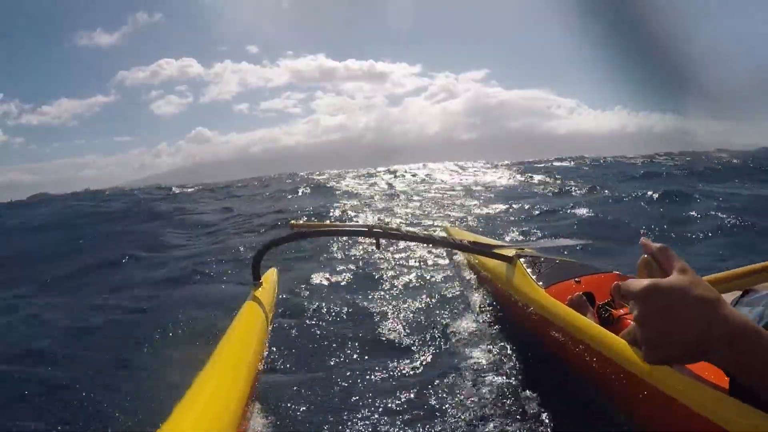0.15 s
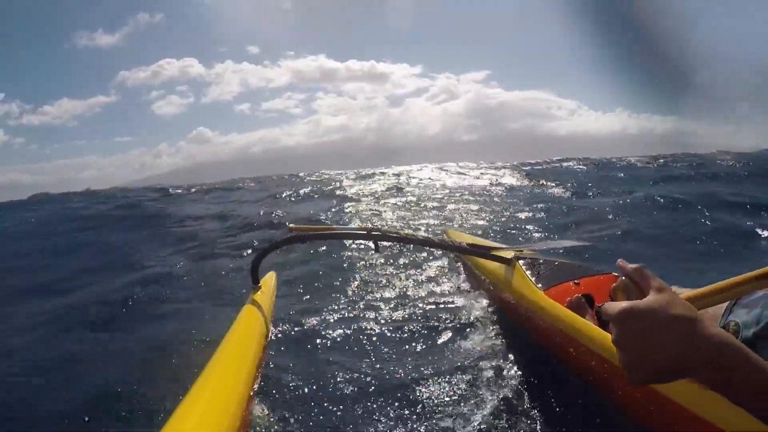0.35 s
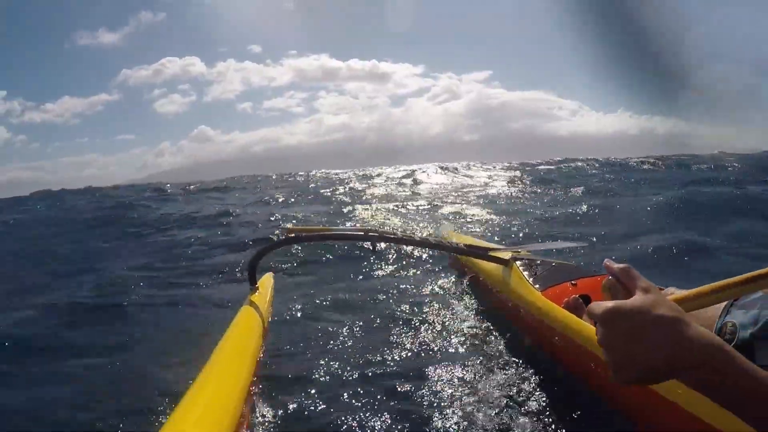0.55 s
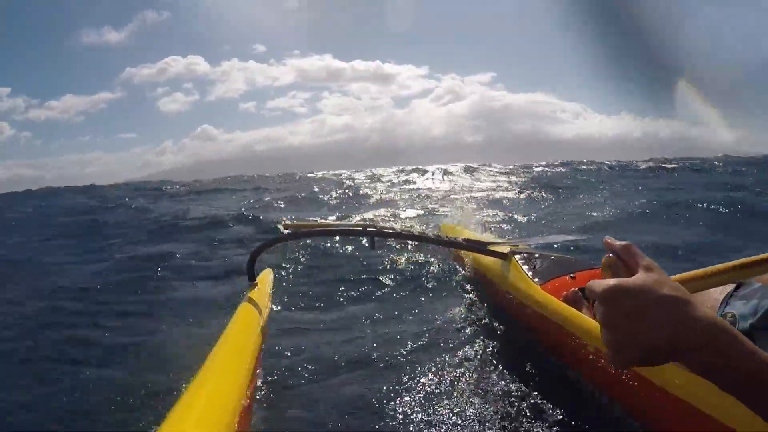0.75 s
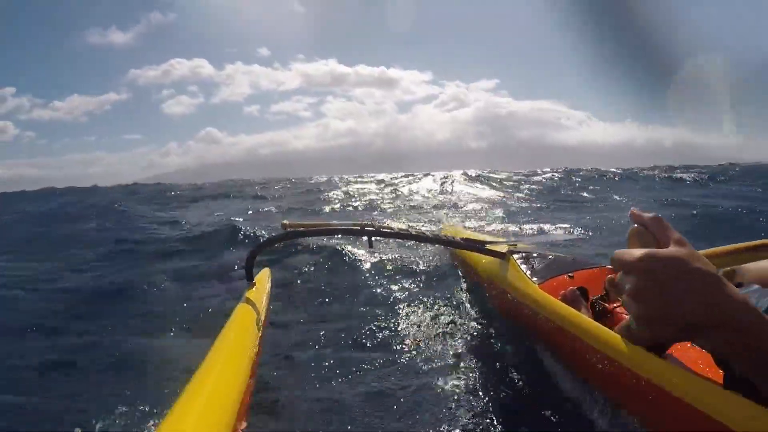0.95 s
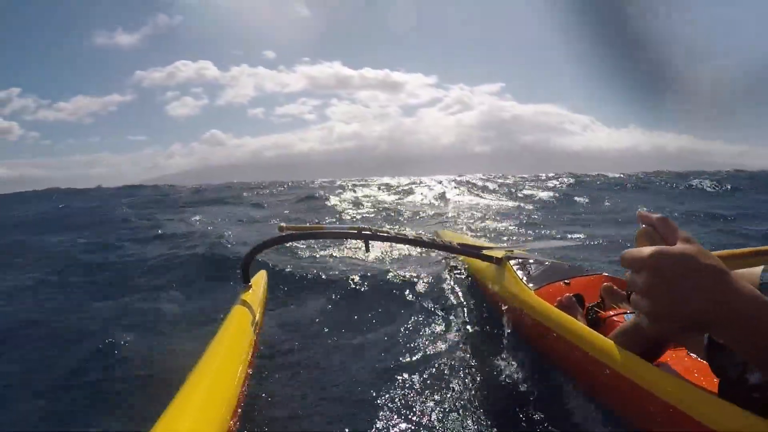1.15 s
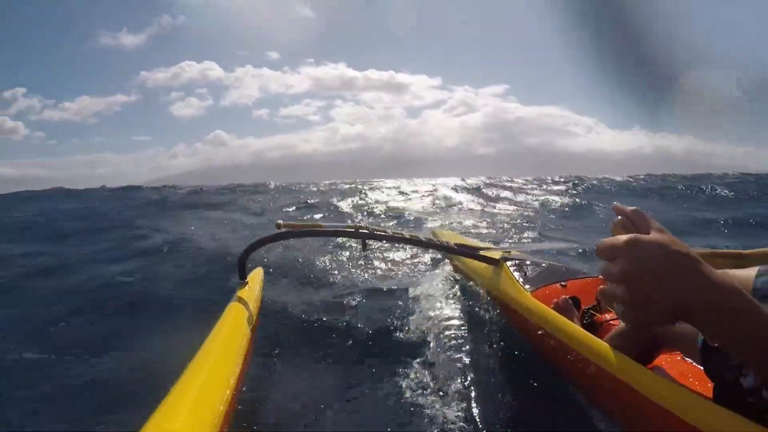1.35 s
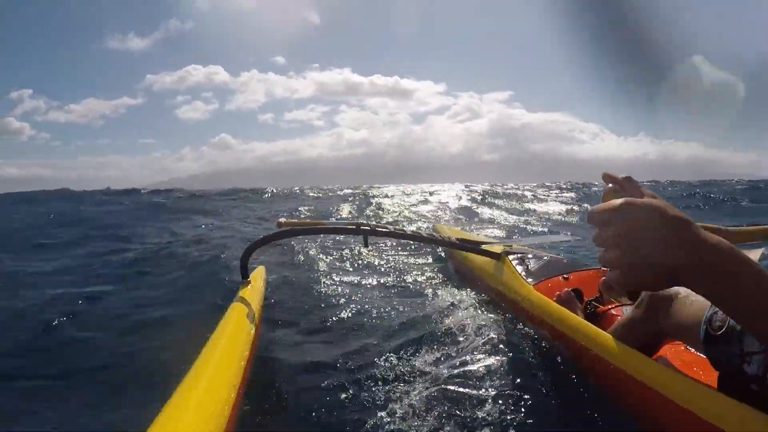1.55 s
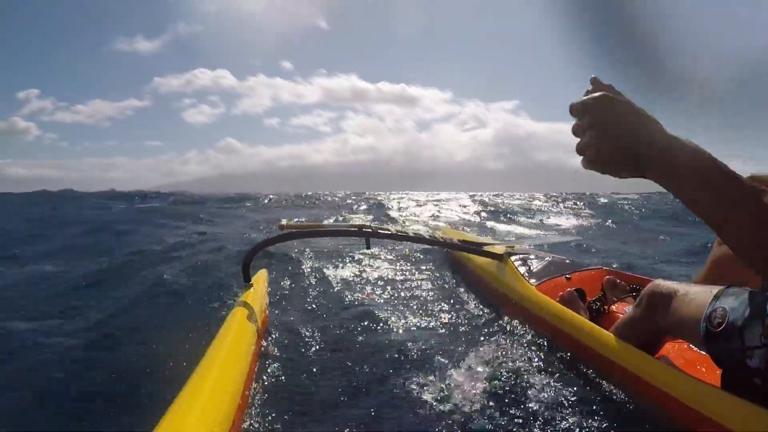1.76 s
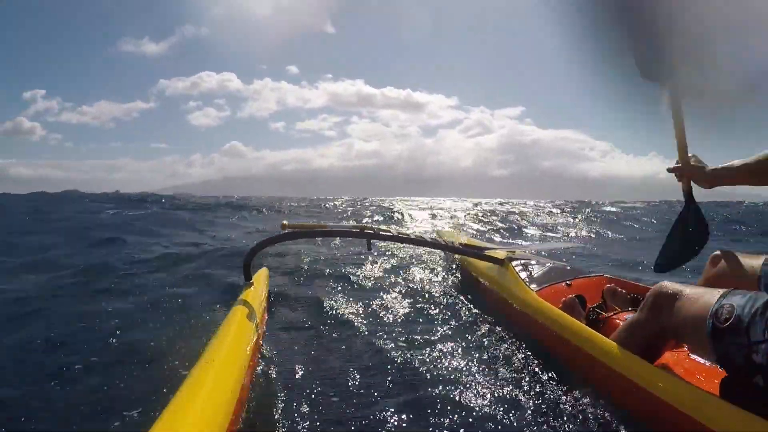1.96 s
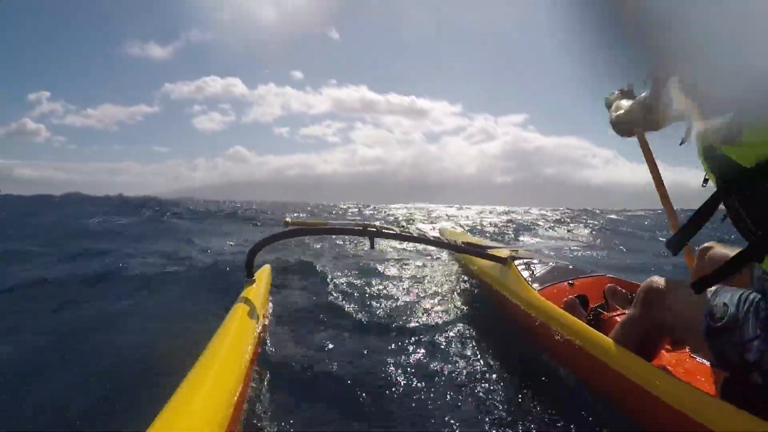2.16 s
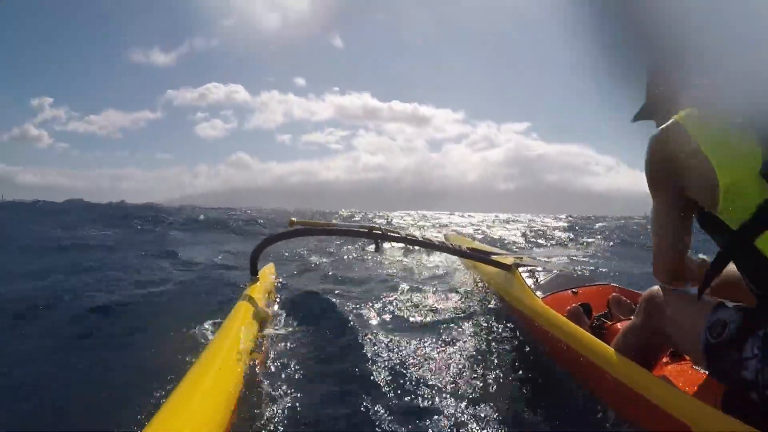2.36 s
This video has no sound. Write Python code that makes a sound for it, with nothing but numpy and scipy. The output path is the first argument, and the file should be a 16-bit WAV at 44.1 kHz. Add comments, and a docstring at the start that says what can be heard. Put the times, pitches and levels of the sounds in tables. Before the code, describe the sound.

Wind buffets the microphone throughout with a low rumble, drone and irregular flapping thuds. Beneath it, water rushes and fizzes along an outrigger canoe on the open sea, with small ticks of spray and popping bubbles close by.

```python
"""A low, gusty rumble and drone of wind is heard first, over water rushing along an outrigger canoe.
Eddies thud on the microphone port of a small camera and excite the resonance of its low cavity;
gusts flap in bursts and slap sharply. Along the hull, many tiny ringing bubbles merge into a fizz,
while spray ticks near the microphone and single bubbles pop. Midway, a wave top breaks with a hiss."""
import sys
import numpy as np
from scipy import signal
from scipy.fft import rfft, irfft
from scipy.io import wavfile
from scipy.ndimage import uniform_filter1d

SR = 44100
rng = np.random.default_rng(int(sys.argv[2]) if len(sys.argv) > 2 else 0)


def file_out(sig):
    """Save sig as 16-bit WAV at sys.argv[1]."""
    # one column per channel
    cols = np.atleast_2d(sig).T
    # limit, then scale
    lim = np.clip(cols, -1, 1)
    pcm = np.round(lim * 32767).astype(np.int16)
    wavfile.write(sys.argv[1], SR, pcm)


N = 110250

# Wind at the port: (time [s], rumble level [dB], drone level [dB], flap level [dB], drone pitch [Hz])
GUSTS = [(0.0, -25, -17, -18.5, 127), (0.13, -27, -19.5, -17, 129.4), (0.19, -11, -16, -21.5, 128.6),
         (0.23, -20, -17, -13, 128.6), (0.28, -21, -15, -47, 115.9), (0.35, -18.5, -11, -17, 123.7),
         (0.49, -13, -17, -19, 132.2), (0.52, -26, -14, -27.5, 128), (0.58, -15.5, -17.5, -14.5, 127),
         (0.64, -38, -17, -26, 127.5), (0.84, -22, -13, -19, 129.8), (0.9, -29, -19, -20, 135.4),
         (0.95, -34, -11.5, -23.5, 118.7), (1.22, -10, -26, -28, 104.7), (1.25, -24.5, -33, -30.5, 108.6),
         (1.3, -11, -10, -12, 123.5), (1.36, -35, -31, -34.5, 109.3), (1.38, -12, -31, -26.5, 107),
         (1.43, -15.5, -18, -14, 140.1), (1.52, -11.5, -16, -21.5, 105.1), (1.59, -31.5, -19, -32.5, 118.5),
         (1.64, -8, -14, -23.5, 109.9), (1.72, -27, -18, -23.5, 119.7), (1.86, -20, -23.5, -39.5, 119),
         (1.89, -32, -22.5, -19, 136.7), (2.05, -16.5, -12.5, -23.5, 115.3), (2.13, -30, -13.5, -14, 129),
         (2.22, -24, -10, -18.5, 117.6), (2.27, -18, -18, -17, 131.5), (2.5, -33, -13, -23, 126.8)]
# Spectra of the rumble, the flapping and its bright edge: (frequency [Hz], relative level [dB])
RUMBLE_SPECTRUM = [(15, -34), (30, -16), (60, -6), (80, -7.5), (120, -8), (300, -68.5)]
FLAP_SPECTRUM = [(120, -39), (170, 1.5), (230, 3), (300, -4), (380, -16)]
EDGE_SPECTRUM = [(300, -3), (400, 5.5), (600, -4.5), (1000, -11), (2000, -23)]
# Water along the hull, before flicker: (time [s], body level [dB], hiss level [dB])
WASH = [(0.0, -30, -34), (0.15, -30, -32), (0.3, -29, -35), (0.45, -29, -37), (0.62, -32, -40),
        (0.8, -32.5, -39.5), (0.94, -29.5, -35.5), (1.1, -30.5, -32.5), (1.25, -26.5, -34),
        (1.42, -31.5, -34.5), (1.57, -28.5, -34), (1.75, -35, -38), (2.11, -30, -35.5), (2.34, -38, -39),
        (2.46, -31.5, -35)]
# Spectra of the water's body and hiss: (frequency [Hz], relative level [dB])
BODY_SPECTRUM = [(330, 0.5), (450, -7.5), (600, -3.5), (1240, -1.5), (2600, -5.5), (3100, -11)]
HISS_SPECTRUM = [(3000, -38.5), (3310, -10.5), (4010, -0.5), (4760, -4.5), (5740, -2), (6370, -5),
                 (7590, -21), (9870, -29.5), (11500, -35.5), (13000, -43.5), (14500, -54.5)]
# Spray impacts: (time [s], drop level [dB], drop rise time [s], mist level [dB])
SPRAY_HITS = [(0.005, -22, 0.011, -43), (0.157, -21, 0.0056, -42), (0.324, -28, 0.01, -66),
              (0.404, -39, 0.0051, -48), (0.66, -34, 0.004, -62), (1.294, -26.5, 0.0088, -66),
              (1.579, -27.5, 0.0089, -64), (1.907, -43, 0.0059, -55), (1.929, -32.5, 0.012, -70),
              (2.103, -28.5, 0.008, -55), (2.1206, -29, 0.0064, -70)]
# Spectra of the drops and of the finest mist: (frequency [Hz], relative level [dB])
DROP_SPECTRUM = [(600, 4.5), (3000, -7), (6000, -1.5), (7500, -17), (9000, -46)]
MIST_SPECTRUM = [(7500, -2), (10000, -9), (12500, -16), (14000, -33)]
# Single bubbles, before roughening: (time [s], peak level [dB], starting pitch [Hz])
POPS = [(0.029, -24, 698), (0.11, -25, 3800), (0.160, -27, 837), (0.303, -20.5, 1420), (0.328, -25, 1960),
        (0.526, -22, 560), (0.874, -23.5, 2305), (0.878, -25.5, 2180), (1.037, -27, 970),
        (1.075, -20, 4160), (1.23, -26.5, 892), (1.726, -25.5, 4062), (1.728, -25, 5220),
        (1.796, -24.5, 1340), (1.828, -28, 1204), (1.842, -35, 1290), (1.864, -32, 2030),
        (1.905, -27, 1590), (1.911, -23, 1665), (1.928, -23, 1207), (1.951, -30, 1320), (2.469, -33, 1140)]
# Slaps of air: (time [s], relative thud level [dB], starting pitch [Hz], crack level [dB])
AIR_SLAPS = [(0.162, -14, 235, -40), (0.356, -4, 328, -18), (0.364, -6.5, 233, -14.5),
             (0.415, -14, 222, -15), (0.451, -5, 252, -15.5), (0.475, -11, 259.7, -15.5),
             (0.495, -5, 236, -25), (0.523, -16, 221, -19.5), (0.723, -9.5, 216.2, -23),
             (0.899, -4, 214.5, -30), (1.287, -11, 209, -22.5), (1.3, -14, 215.3, -27),
             (1.411, 0, 223, -18.5), (1.437, -8.5, 214.6, -15), (1.482, -8.5, 304.2, -23),
             (1.887, -17.5, 223.5, -23.5), (2.113, -14, 354.7, -29), (2.124, -6.5, 364.5, -25.5),
             (2.168, -24, 217.6, -20), (2.268, -19, 239, -18), (2.284, -22, 259.2, -19.5),
             (2.351, -18, 224.5, -25)]
# Spectrum of a slap's crack: (frequency [Hz], relative level [dB])
CRACK_SPECTRUM = [(350, 6), (500, 3), (850, 1.5), (1200, -13), (2000, -28.5)]

TIME = np.arange(N) / SR


def amp(db):
    """Amplitude grows tenfold for every 20 dB."""
    return 10 ** (np.asarray(db) / 20)


def unit_rms(x):
    """Normalisation to a mean power of one."""
    return x / np.sqrt(np.mean(x ** 2) + 1e-20)


def curves(table):
    """Linear interpolation over time of each column after the first."""
    times, *columns = np.transpose(table)
    return [np.interp(TIME, times, column) for column in columns]


def coloured(x, spectrum):
    """Spectral shaping, falling 30 dB per octave beyond the given ends; rms 1."""
    knots_hz, db = np.transpose(spectrum)
    hz = np.fft.rfftfreq(len(x), 1 / SR) + 1
    octaves_out = np.maximum(np.log2(knots_hz[0] / hz), 0) + np.maximum(np.log2(hz / knots_hz[-1]), 0)
    gain_db = np.interp(np.log(hz), np.log(knots_hz), db) - 30 * octaves_out
    return unit_rms(irfft(rfft(x) * amp(gain_db), len(x)))


def noise(spectrum, samples=N):
    """Filtered white noise takes on the filter's spectrum."""
    return coloured(rng.standard_normal(samples), spectrum)


def smoothed(x, seconds):
    """Two moving averages act as a low-pass filter."""
    span = max(round(seconds * SR), 1)
    return uniform_filter1d(uniform_filter1d(x, span), span)


def wander(seconds):
    """Low-passed noise fluctuates on the given time scale; rms 1."""
    return unit_rms(smoothed(rng.standard_normal(N), seconds))


def steadied(x, seconds, strength=0.45):
    """Compression by the local power evens out part of a noise's random swells."""
    power = abs(smoothed(x ** 2, seconds))
    return unit_rms(x / (power + 0.17) ** (strength / 2))


def damped_tone(hz, cycles, glide):
    """A damped oscillation with a soft onset; pitch shifts by the fraction glide every `cycles`."""
    turns = np.arange(round(6 * cycles * SR / hz)) * hz / SR
    age = turns / cycles
    envelope = 2 * age * np.exp(1 - 2 * age)
    return envelope * np.sin(2 * np.pi * turns * (1 + glide * age / 2))


def cavity_drone(pitch_hz, pole_width_hz=84):
    """A resonant cavity driven by random eddies responds in a narrow band about its pitch."""
    pole = np.exp(-np.pi * pole_width_hz / SR)
    eddies = rng.standard_normal(N) + 1j * rng.standard_normal(N)
    envelope = signal.lfilter([1], np.poly([pole] * 3), eddies)
    carrier = np.exp(2j * np.pi * np.cumsum(pitch_hz) / SR)
    return unit_rms((envelope * carrier).real)


def wind():
    """Turbulent pressure at the port rumbles, drones and flaps; harder flapping is brighter."""
    rumble_db, drone_db, flap_db, pitch_hz = curves(GUSTS)
    rumble = steadied(noise(RUMBLE_SPECTRUM), 0.055)
    drone = steadied(cavity_drone(pitch_hz), 0.034)
    lumps = unit_rms(noise(FLAP_SPECTRUM) * amp(4.5 * wander(0.014)))
    flap = steadied(lumps, 0.02)
    edge = noise(EDGE_SPECTRUM) * amp(-12.5 + 0.37 * (flap_db + 22))
    return amp(rumble_db) * rumble + amp(drone_db) * drone + amp(flap_db) * (flap + edge)


def fizz(bubbles_per_s=2500):
    """Superposition: many randomly timed bubble resonances of similar energy merge into a fizz."""
    strength = amp(0.5 * np.minimum(rng.exponential(1, N), 3.2))
    impulses = strength * (rng.random(N) < bubbles_per_s / SR)
    pitch_index = rng.integers(0, 30, N)
    out = np.zeros(N)
    for k, hz in enumerate(np.geomspace(400, 12000, 30)):
        ring = damped_tone(hz, cycles=4.85, glide=0.1) * np.sqrt(hz)
        out += signal.oaconvolve(impulses * (pitch_index == k), ring)[:N]
    return unit_rms(out)


def hull_wash():
    """Flow noise and fizz fill two bands, which flicker together by common amplitude modulation."""
    body_db, hiss_db = curves(WASH)
    rush = unit_rms(rng.standard_normal(N) + amp(-5.5) * fizz())
    surge_db = 0.37 * wander(0.04) + 0.52 * wander(0.0052)
    body = coloured(rush, BODY_SPECTRUM + [(4200, -29)]) * amp(body_db + 0.68 * wander(0.011))
    hiss = coloured(rush, HISS_SPECTRUM) * amp(hiss_db + 0.23 * wander(0.054))
    return (body + hiss) * amp(surge_db)


def pulse(age):
    """An impact's envelope rises to one at age 1, then decays almost exponentially."""
    return age * np.exp(1 - age)


def spray(mist_speedup=1.2):
    """Brief impacts radiate broadband noise; the finest drops give a higher, quicker tick."""
    drops, mist = np.zeros((2, N))
    for start, drop_db, rise_s, mist_db in SPRAY_HITS:
        age = np.arange(0, 9, 1 / (SR * rise_s))
        add(drops, start, amp(drop_db) * pulse(age) ** 1.43)
        add(mist, start, amp(mist_db) * pulse(mist_speedup * age) ** 2)
    white = rng.standard_normal(N)
    return drops * coloured(white, DROP_SPECTRUM) + mist * coloured(white, MIST_SPECTRUM)


def bubbles(roughness=0.45):
    """Each bubble rings as a damped resonator, rising slightly; fast modulation roughens the tone."""
    out = np.zeros(N)
    for start, db, hz in POPS:
        add(out, start, amp(db) * damped_tone(hz, cycles=8.8, glide=0.021))
    return out * (1 + roughness * wander(0.00058))


def air_slaps(thud_trim_db=-1, crack_rise_s=0.0058):
    """Pressure transients in the gusts give heavily damped, falling thuds topped by a noisy crack."""
    out = np.zeros(N)
    for start, thud_db, hz, crack_db in AIR_SLAPS:
        thud = amp(thud_db + thud_trim_db) * damped_tone(hz, cycles=2.35, glide=-0.13)
        age = np.arange(len(thud)) / (crack_rise_s * SR)
        crack = steadied(noise(CRACK_SPECTRUM, 4096), 0.0033)[:len(thud)]
        add(out, start, thud + amp(crack_db) * pulse(age) ** 2 * crack)
    return out


def wave_crest(peak_s=1.247, width_s=0.088, level_db=-37.5, hz=5580):
    """A breaking wave top fizzes out as narrow-band noise under a Gaussian envelope."""
    swell = np.exp(-((TIME - peak_s) / width_s) ** 2)
    return amp(level_db) * swell * noise([(hz, 0)])


def add(mix, start_s, sound):
    """Superposition of a sound on the mix from its start time."""
    part = mix[round(start_s * SR):][:len(sound)]
    part += sound[:len(part)]


def scene():
    """The pressures of wind and water sum linearly in one channel."""
    return (wind() + air_slaps() + hull_wash() + bubbles() + spray() + wave_crest())[None]


def record(dry):
    """Soft saturation rounds the peaks, then a low-pass filter limits the bandwidth."""
    saturated = 0.95 * np.tanh(dry / 0.97)
    padded = np.pad(saturated, ((0, 0), (255, 255)), "reflect")
    lowpass = signal.firwin(511, cutoff=15100, window=("kaiser", 9), fs=SR)
    return signal.oaconvolve(padded, lowpass[None], "valid")


dry = scene()
out = record(dry)
file_out(out)
```